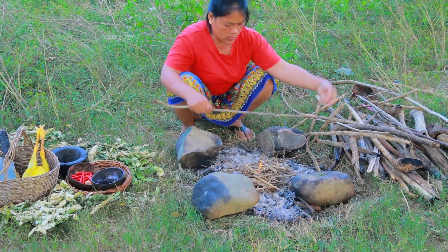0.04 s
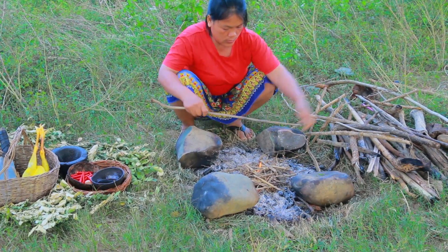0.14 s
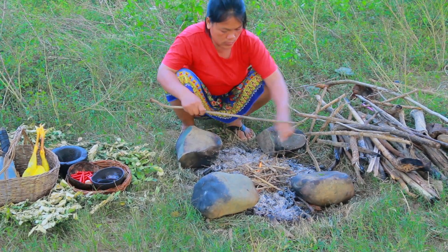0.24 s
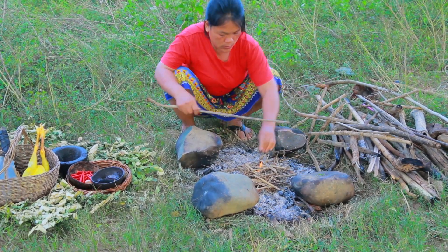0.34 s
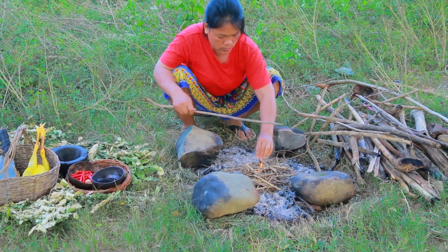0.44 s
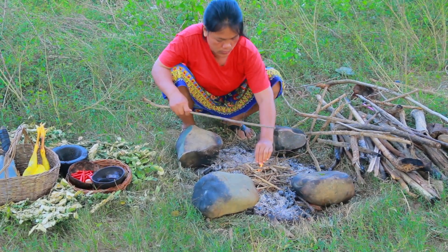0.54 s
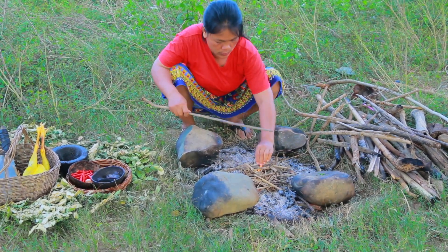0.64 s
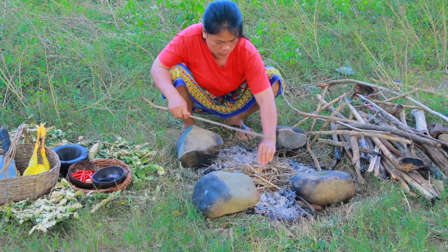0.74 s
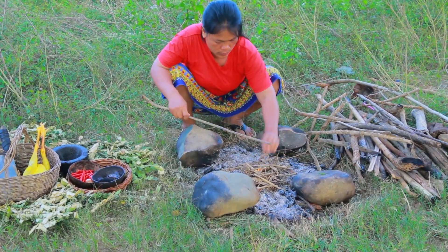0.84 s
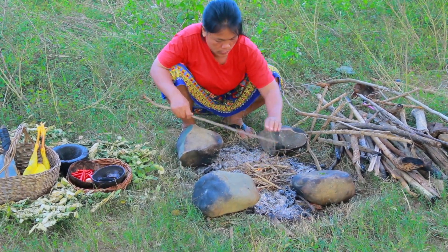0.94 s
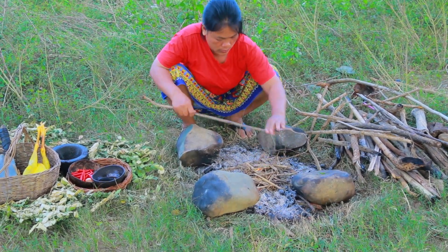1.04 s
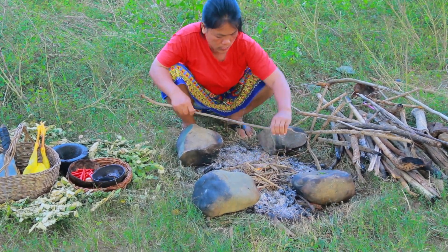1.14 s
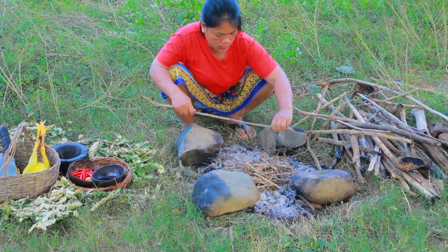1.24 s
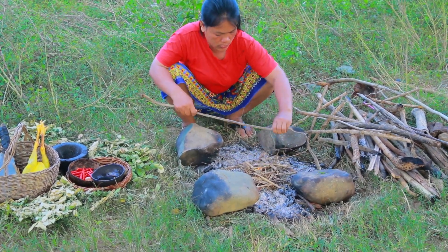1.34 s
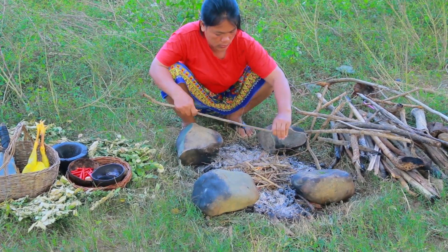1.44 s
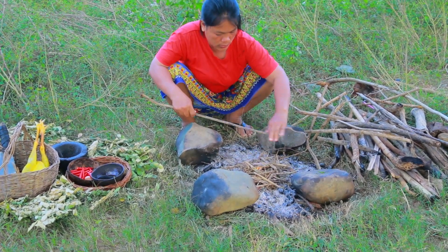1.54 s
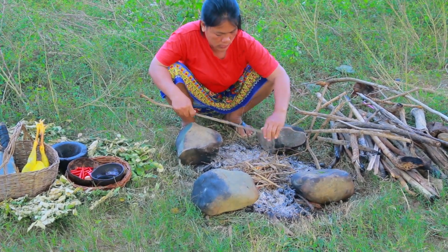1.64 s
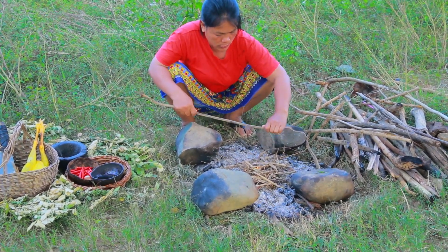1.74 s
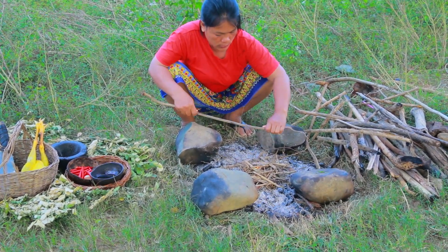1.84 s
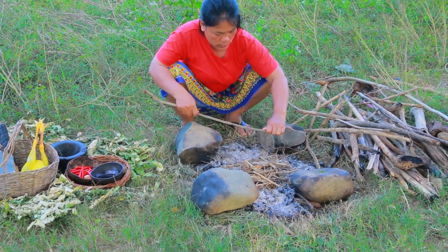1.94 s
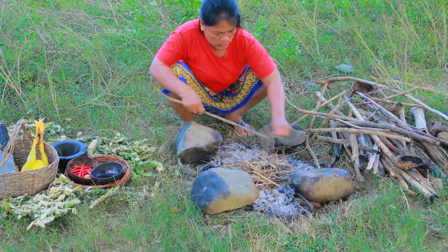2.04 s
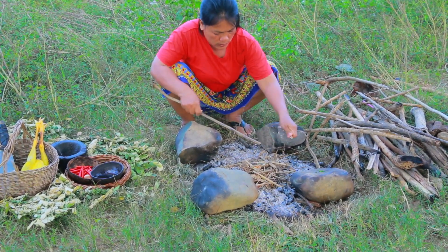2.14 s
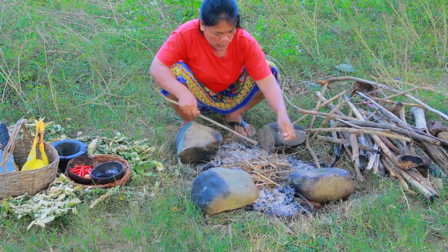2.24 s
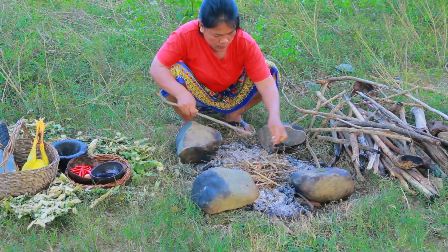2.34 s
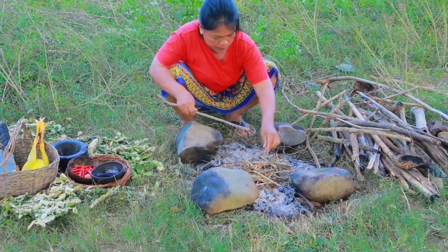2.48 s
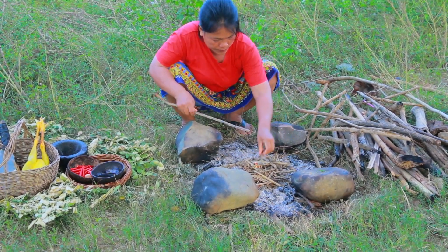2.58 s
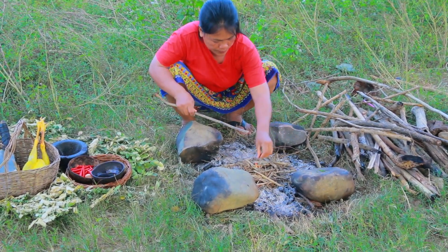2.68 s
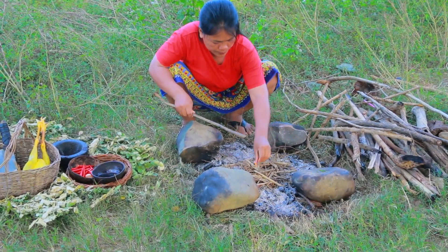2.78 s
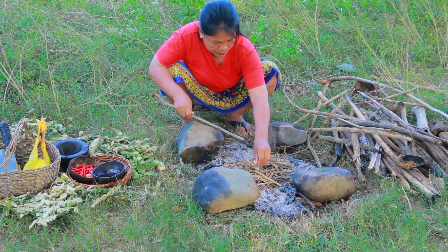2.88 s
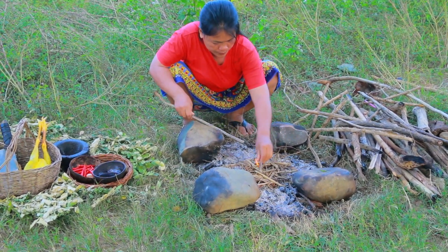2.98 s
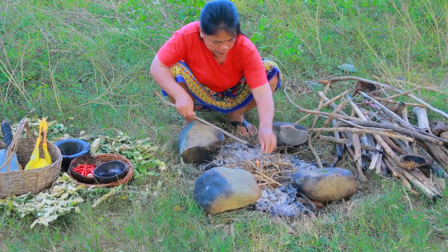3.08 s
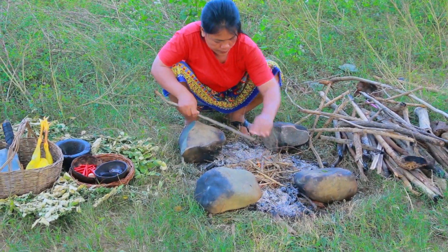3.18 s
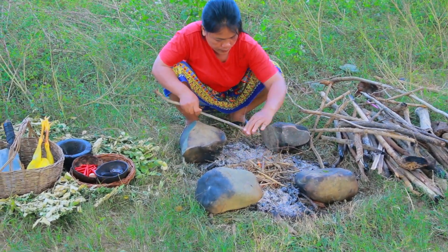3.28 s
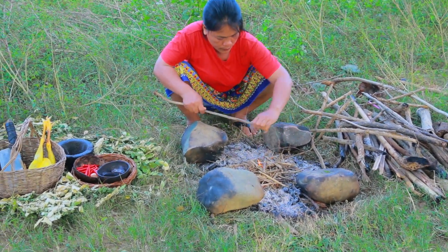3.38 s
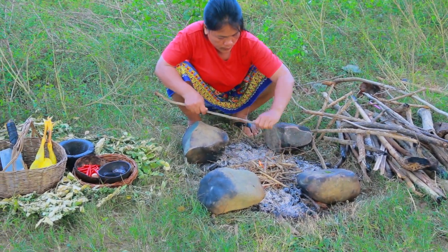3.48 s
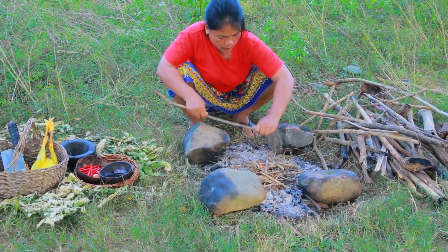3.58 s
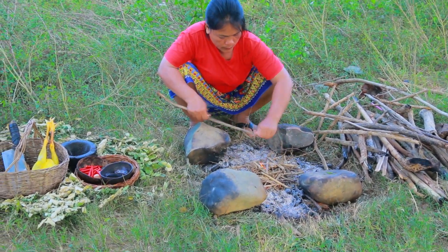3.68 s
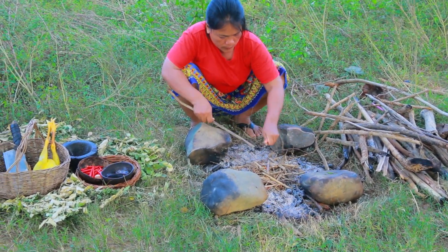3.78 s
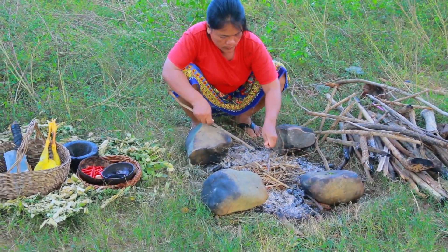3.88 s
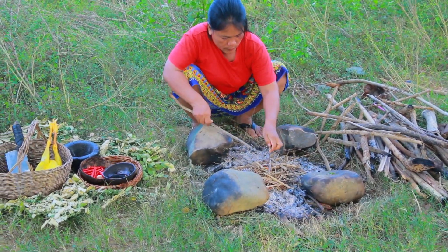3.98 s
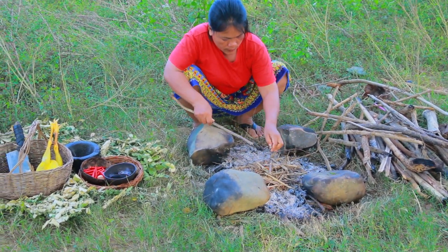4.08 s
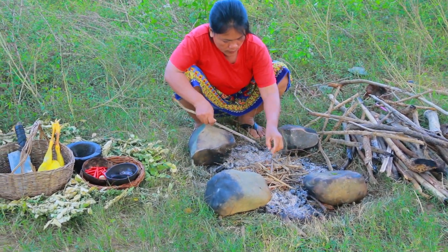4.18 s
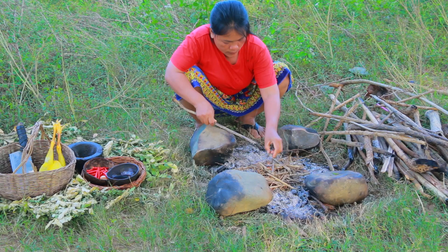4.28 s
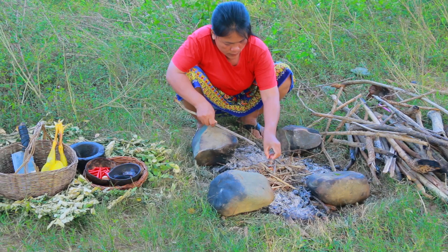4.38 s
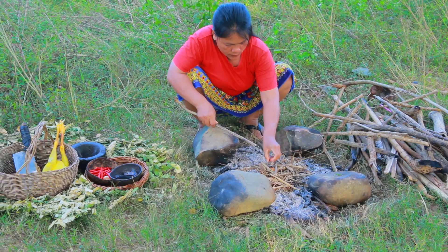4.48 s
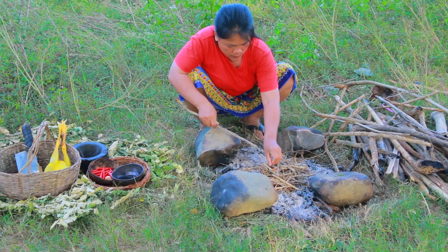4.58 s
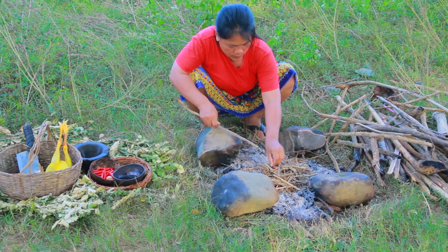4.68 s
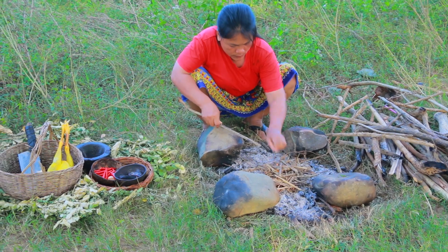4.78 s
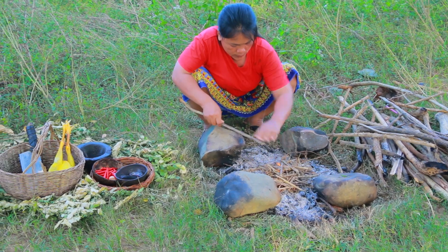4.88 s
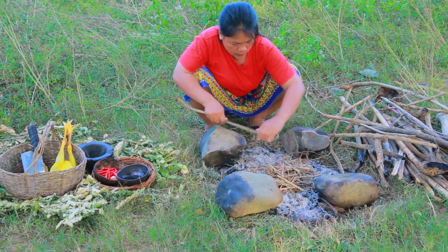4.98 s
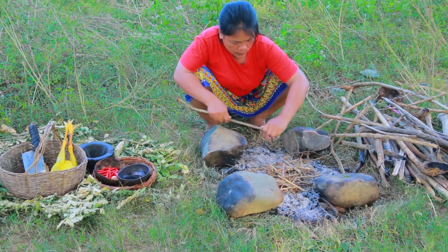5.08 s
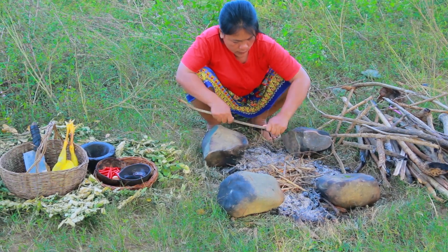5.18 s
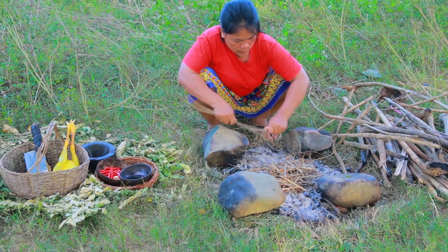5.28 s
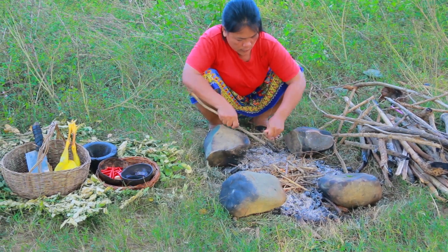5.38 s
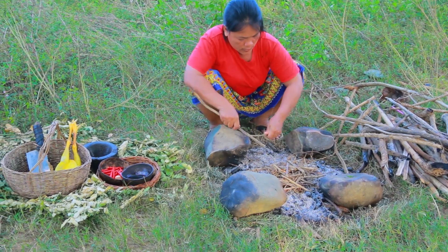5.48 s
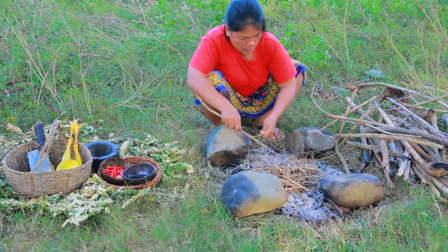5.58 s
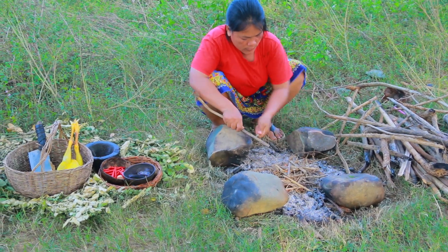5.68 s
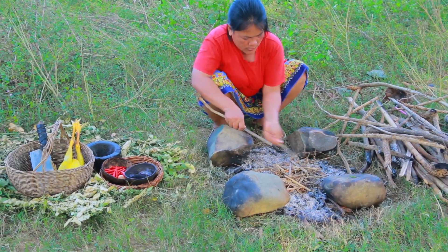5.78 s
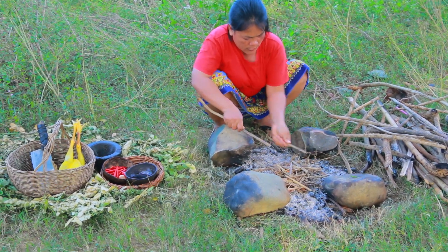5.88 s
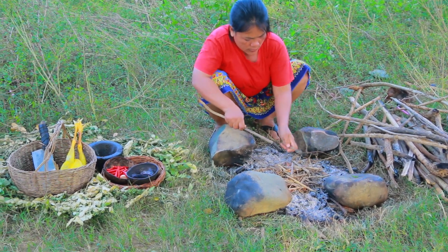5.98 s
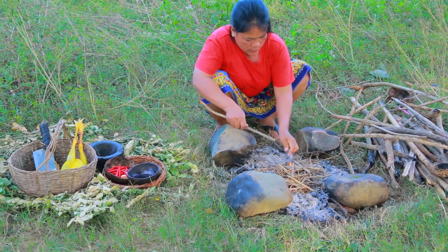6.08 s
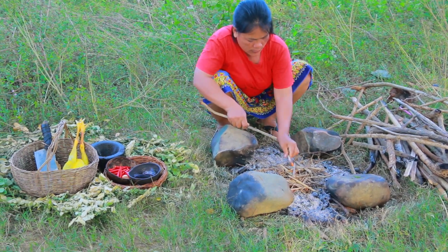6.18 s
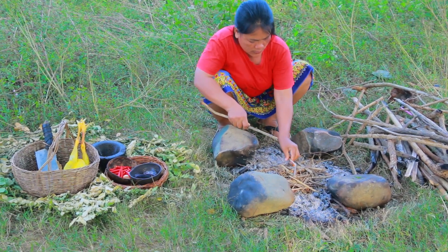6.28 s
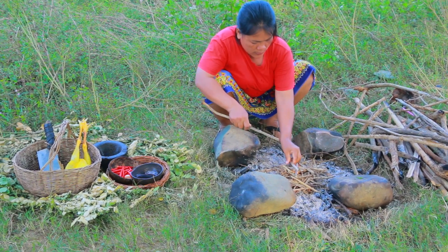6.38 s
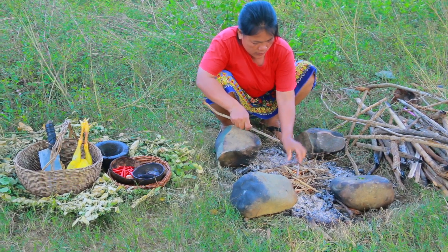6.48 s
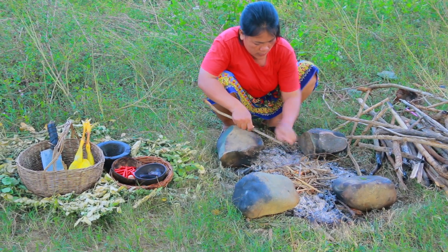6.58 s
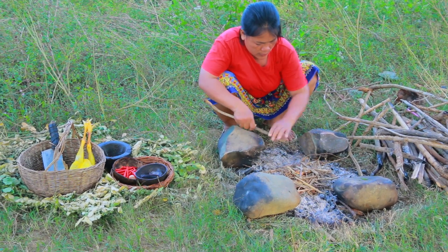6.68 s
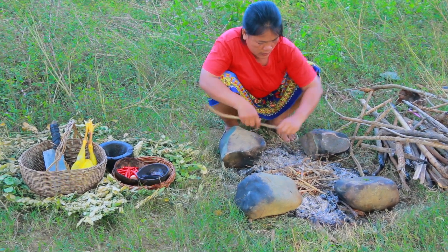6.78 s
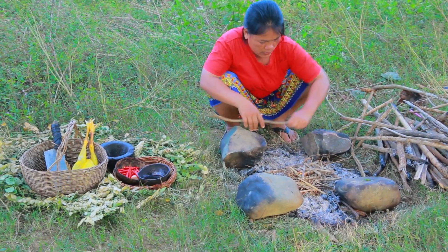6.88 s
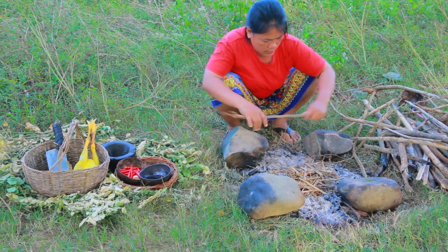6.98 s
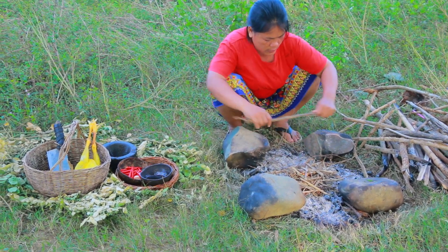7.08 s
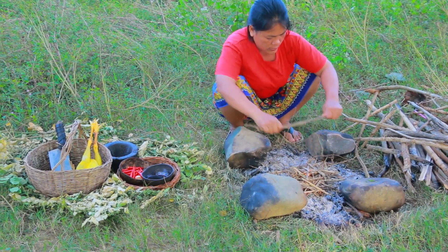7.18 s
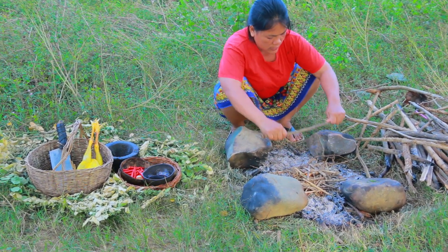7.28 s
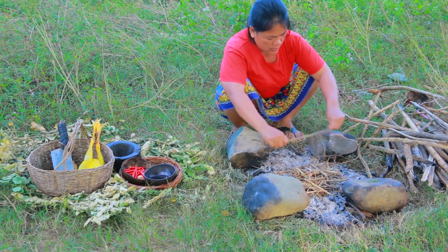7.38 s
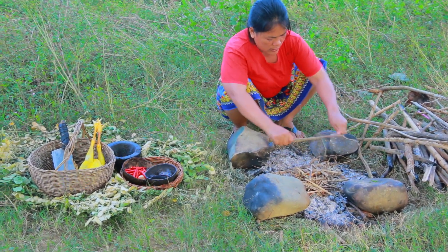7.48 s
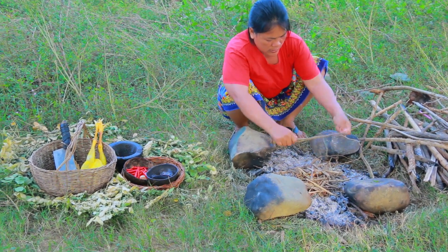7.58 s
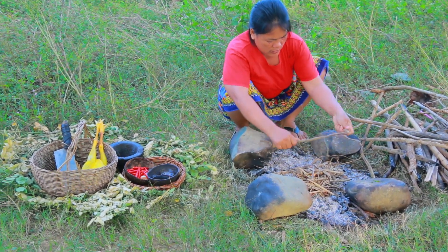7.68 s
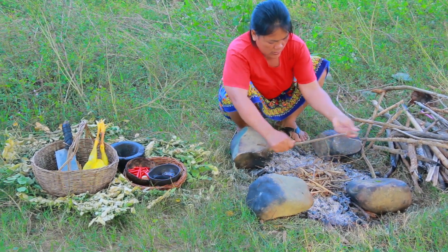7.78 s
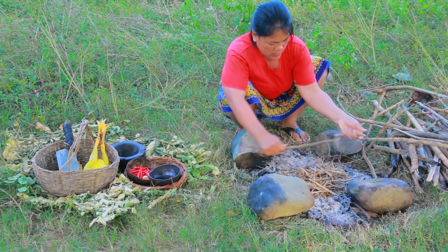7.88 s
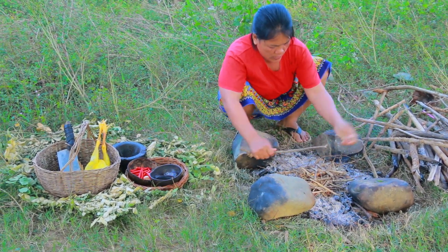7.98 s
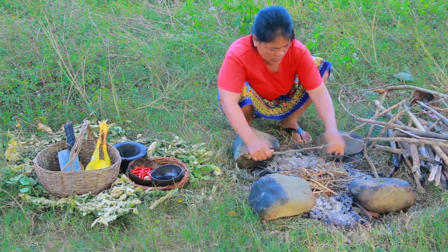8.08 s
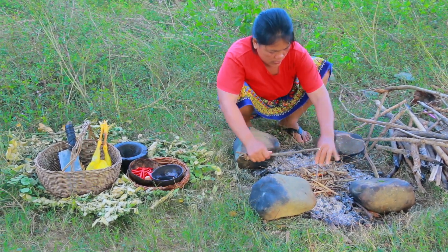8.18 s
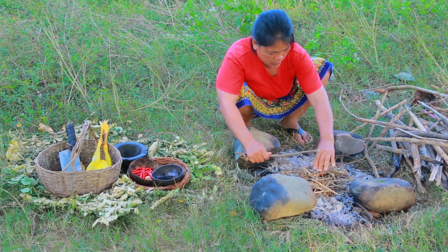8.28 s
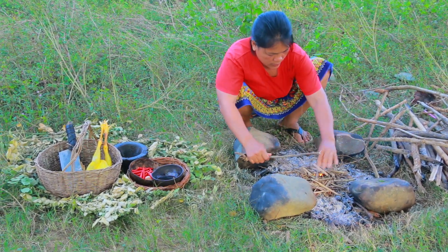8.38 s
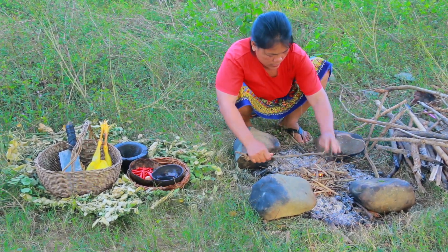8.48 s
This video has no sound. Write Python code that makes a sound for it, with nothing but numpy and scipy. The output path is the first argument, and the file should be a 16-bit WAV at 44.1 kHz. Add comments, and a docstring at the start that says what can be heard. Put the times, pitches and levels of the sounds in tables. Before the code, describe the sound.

A steady distant rush and a soft hiss fill a grassy clearing throughout, with a very faint, high buzz of far insects. For the first three seconds a light breeze buffets mainly the left microphone with low thumps, strongest around 1.5 seconds, then falls calm. Slightly right of centre, a dry stick is bent by hand: a few fibres tick, and it breaks with a loud, sharp crack at about 2 seconds. A softer, hollower snap follows at 3.7 seconds, and a quick double snap at about 5.3 and 5.4 seconds, both led by tiny ticks. Twig taps lightly on twig around 5.7 seconds. Another loud, crisp crack comes at about 7.5 seconds, followed by two faint taps. Each crack leaves a short, bright tail from the surrounding plants. The rush and hiss carry on to the end, near 8.7 seconds.

```python
"""A dry stick is snapped into kindling by hand, in a grassy clearing, a little right of the microphones.
A few fibres tick as it bends, then it cracks, and the plants around scatter each crack into a short
bright tail; now and then twig touches twig. At first a breeze buffets the left microphone.
Behind it all lie a steady distant rush, a hiss from all around and the faint buzz of far insects."""
import sys
import numpy as np
from scipy import signal
from scipy.fft import rfft, irfft, next_fast_len
from scipy.io import wavfile
from scipy.ndimage import uniform_filter1d

SR = 44100
rng = np.random.default_rng(int(sys.argv[2]) if len(sys.argv) > 2 else 0)


def put_to_file(sound):
    """Save the sound as 16-bit audio at rate SR, in the file named by the first command-line argument."""
    columns = np.atleast_2d(sound).T  # one column per channel
    safe = np.clip(columns, -1, 1)
    whole_steps = np.round(safe * 32767)
    wavfile.write(sys.argv[1], SR, whole_steps.astype(np.int16))


N = 376613
TIME = np.arange(N) / SR


def snaps(size=16384, ring_width=0.14, tail_ring=0.59):
    """Each break rings at pitches set by the length of the piece; the echoes blur that ring."""
    # breaks, each with a low and a high ring:
    # start_s, level_db, tear_t60_s, body_db, top_db, low_hz, low_db, high_hz, high_db, scatter_db
    breaks = [(2.0434, -4.5, 0.02, -1.5, 0, 5560, 4, 10300, 6, -12.5),
              (3.7395, -17.5, .023, -1, 3, 1620, 16, 8000, 5.5, -8),
              (3.7424, -17.5, 0.013, -4, 3, 1200, 15, 1570, 7, -13),
              (5.3312, -15.5, 0.025, -7, 0, 3500, 6, 4970, 3, -10),
              (5.4262, -19.5, 0.018, -6, 10, 4900, 7, 9600, 17, -10),
              (7.4570, -6, 0.0092, -3.5, 1, 2860, 7.5, 13200, 7, -16)]
    # resonances of the stick, and one hollow: pitch_hz, width_hz, gain_db
    stick_modes = [(3900, 120, -6), (4340, 160, 5.5), (4940, 130, 4), (5670, 210, 0), (6400, 280, 4.5),
                   (7800, 580, 5.5), (9400, 260, -1), (10400, 350, 0), (11500, 210, 0), (14300, 400, 6)]
    out, t, hz = np.zeros((2, N)), np.arange(size) / SR, bins(size)
    for start_s, db, tear_t60_s, body_db, top_db, low_hz, low_db, high_hz, high_db, scatter_db in breaks:
        rings = [(low_hz, ring_width * low_hz, low_db), (high_hz, ring_width * high_hz, high_db)]
        piece_db = humps(rings, hz)
        wood_db = wood_colour(hz, body_db, top_db)
        crack = fracture(t, wood_db + piece_db + humps(stick_modes, hz), tear_t60_s)
        tail = amp(scatter_db) * scatter(t, wood_db + tail_ring * piece_db)
        add(out, start_s, amp(db) * (crack + tail))
    return out


def fracture(t, colour_db, tear_t60_s, crack_t60_s=0.0013, tear_db=-7, grain_db=3, rise_s=0.000134):
    """A sharp first split, then a dying run of tearing fibres, heard with its bounce off the ground."""
    decay = amp(-60 * t / crack_t60_s) + amp(tear_db - 60 * t / tear_t60_s)
    force = (1 - np.exp(-t / rise_s)) * decay
    mid, side = rng.standard_normal((2, len(t)))
    grain = amp(grain_db * np.repeat(rng.standard_normal(len(t)), 12)[:len(t)])
    crack = force * grain * (mid + 0.26 * side * [[1], [-1]])
    crack[:, round(rise_s * SR)] += 1   # the main bundle of fibres lets go at once
    hz = bins(len(t))
    crack = tint(crack, colour_db + ground_echo(hz))
    half_sample_delay = np.exp(-1j * np.pi * hz / SR)
    crack[0] = irfft(rfft(crack[0]) * half_sample_delay)   # reaches the left microphone later
    return unit_burst(crack)


def wood_colour(hz, body_db, top_db):
    """Colour in dB: thick wood adds body under 4 kHz, thin splinters add top above 11.5 kHz."""
    # spectrum of splitting wood: frequency_hz, level_db
    wood = [(100, -30), (850, -21), (1400, 2), (2200, -0.5), (3000, 0.5), (3900, -1), (4900, -2),
            (10000, -2), (12500, -5.5), (15000, -14), (16000, -28)]
    body = 1 / (1 + (hz / 4000) ** 6)
    top = 1 / (1 + (11500 / hz) ** 16)
    return at_hz(wood, hz) + body_db * body + top_db * top


def ground_echo(hz, strength=0.22, delay_s=0.00202):
    """Comb in dB from the bounce off the ground just after the direct sound."""
    return 20 * np.log10(np.abs(1 + strength * np.exp(-2j * np.pi * hz * delay_s)))


def scatter(t, colour_db, t60_s=0.23, build_s=0.0025):
    """Countless faint echoes from grass and bushes, with the energy of one fracture."""
    # colour that the plants give to scattered sound: frequency_hz, gain_db
    foliage = [(300, -6), (1500, -24), (3000, 2.5), (5000, 5), (10000, 5), (12500, 3.5), (14500, 4),
               (16000, 14)]
    echoes = rng.standard_normal((2, len(t))) * (1 - np.exp(-t / build_s)) * amp(-60 * t / t60_s)
    return unit_burst(tint(echoes, colour_db + at_hz(foliage, bins(len(t)))))


def fibre_ticks():
    """Single fibres give way as the stick bends; the less body one has, the more it rings."""
    # fibres letting go: start_s, level_db, body_db, ring_hz
    fibres = [(1.9680, -50, -10, 9300), (1.9750, -50, -10, 9000), (1.9824, -37.5, -21, 9200),
              (2.0146, -42, -13, 9300), (2.0300, -39, -7, 9000), (3.666, -38, -4, 6000),
              (3.7040, -34.5, -7, 9500), (3.7146, -47, -4, 8000), (5.2928, -33.5, -1, 5200),
              (5.3183, -38, -5, 7000), (5.5037, -38.5, -9, 6500)]
    return sum(tick(start_s, db, body_db, top_db=3, ring_hz=ring_hz, ring_db=-0.5 * body_db)
               for start_s, db, body_db, ring_hz in fibres)


def twig_touches():
    """Twig knocks lightly on twig; they all ring alike."""
    # light touches: start_s, level_db, body_db, top_db
    touches = [(1.3044, -56, -6, 7), (5.6844, -38.5, 4, 11), (5.7714, -42.5, -8, -1), (7.5967, -38, 10, 2),
               (7.833, -46, 0, 0)]
    return sum(tick(*touch, ring_hz=4700, ring_db=5.5) for touch in touches)


def tick(start_s, db, body_db, top_db, ring_hz, ring_db, size=16384, ring_width=0.24, scatter_db=-7):
    """One tiny fracture or tap with one broad ring, and its tail from the plants."""
    out, t, hz = np.zeros((2, N)), np.arange(size) / SR, bins(size)
    colour_db = wood_colour(hz, body_db, top_db) + humps([(ring_hz, ring_width * ring_hz, ring_db)], hz)
    crack = fracture(t, colour_db, tear_t60_s=0.013)
    tail = amp(scatter_db) * scatter(t, colour_db)
    add(out, start_s, amp(db) * (crack + tail))
    return out


def breeze():
    """Eddies thump on the microphones, mostly the windward left one, then the air falls calm."""
    # spectrum of the buffeting: frequency_hz, density_db
    buffet = [(20, -16), (35, -11), (50, 5), (85, 1.5), (150, -1), (250, -14), (450, -39), (1500, -69)]
    eddies = noise(buffet)
    eddies /= np.sqrt(uniform_filter1d(eddies ** 2, size=2600) + 1e-9)   # the wind alone sets the level
    return wind_strength() * eddies * pan(left_db=13)


def wind_strength(peak_s=1.83, peak_db=-46.5, rise_db_per_s=8, fall_db_per_s=36, calm_db=-69.5):
    """Bell-shaped gusts ride on one slow rise and fall of the breeze; their powers add."""
    # gusts on the microphones: peak_s, level_db, length_s
    gusts = [(.35, -43.5, .2), (.55, -47, .1), (.84, -39.5, .11), (1.16, -40.5, 0.2), (1.462, -34, 0.09),
             (1.54, -28.5, 0.063), (1.62, -36, .12), (2.331, -39.5, 0.072), (2.561, -40.5, 0.055),
             (2.83, -47, .05)]
    edge_db = 10.5   # a gust is this much weaker at both ends of its length
    late_s = TIME - peak_s
    swell = amp(peak_db - np.maximum(-rise_db_per_s * late_s, fall_db_per_s * late_s))
    gust_power = sum(amp(db - edge_db * np.minimum((2 * (TIME - at_s) / length_s) ** 2, 20)) ** 2
                     for at_s, db, length_s in gusts)
    return np.sqrt(amp(calm_db) ** 2 + swell ** 2 + gust_power)


def air(rush_db=-39.0, hiss_db=-46.5, lift_db=0.98, settle_s=2.6):
    """A distant rush, a little to the left, and hiss from all around; both ease as the breeze drops."""
    # distant rush, alike at both microphones: frequency_hz, density_db
    rush_spectrum = [(25, -19), (45, -20), (65, -6), (110, -9), (220, -1), (330, -1), (490, -12.5),
                     (1000, -12), (2000, -16), (3200, -23.5), (5000, -34.5), (9500, -52), (16000, -58)]
    # its broad resonances: pitch_hz, width_hz, gain_db
    rush_modes = [(748, 236, 7.5), (1135, 183, 7), (1351, 234, 9), (1796, 300, 6.5), (2536, 364, 9)]
    # hiss, unrelated at the two microphones: frequency_hz, density_db
    hiss_spectrum = [(25, -24), (60, -47), (170, -10), (290, -3), (500, -9.5), (850, -2), (1400, -0.5),
                     (2200, -1.5), (4000, -6.5), (6000, -14), (8300, -17.5), (9600, -17.5), (11500, -23.5),
                     (16000, -34)]
    rush = amp(rush_db) * noise(rush_spectrum, rush_modes, channels=1) * pan(left_db=0.55)
    hiss = amp(hiss_db) * noise(hiss_spectrum) * pan(left_db=-1.5)
    return (rush + hiss) * amp(lift_db / (1 + np.exp(2 * (TIME - settle_s))))


def insects(fade_s=0.25, chorus_db=-78):
    """A far insect buzzes in long calls that swell, hold and fade; others buzz steadily further off."""
    # narrow high band of the buzz: frequency_hz, density_db
    buzz_band = [(6200, -40), (6520, 3), (6760, -1), (7100, -40)]
    # calls: start_s, end_s, level_db
    calls = [(-.3, 2.1, -73), (6.7, 8.1, -74)]
    calling = sum(amp(db) * np.clip(np.minimum(TIME - start_s, end_s - TIME) / fade_s + .5, 0, 1)
                  for start_s, end_s, db in calls)
    return np.hypot(calling, amp(chorus_db)) * noise(buzz_band, channels=1)


def amp(db):
    """Decibels to gain."""
    return 10 ** (np.asarray(db) / 20)


def rms(x):
    """Root mean square."""
    return np.sqrt(np.mean(x ** 2) + 1e-20)


def unit_burst(x):
    """Scale a stereo burst to the energy of 5 ms at rms 1."""
    return x / rms(x) * np.sqrt(.005 * SR / x.shape[1])


def bins(size):
    """Frequencies of a spectrum of this many samples."""
    return np.maximum(np.arange(size // 2 + 1) * SR / size, 1)


def at_hz(points, hz):
    """Read a spectrum on a log-frequency axis."""
    point_hz, point_db = np.array(points).T
    return np.interp(np.log(hz), np.log(point_hz), point_db)


def humps(modes, hz):
    """Bell-shaped lifts in dB, one for each resonance."""
    return sum(db * np.exp(-2 * ((hz - centre) / width) ** 2) for centre, width, db in modes)


def tint(x, curve_db):
    """Causal (minimum-phase) filter with this gain at every frequency bin."""
    cepstrum = irfft(np.log(amp(curve_db)))
    size = len(cepstrum)
    cepstrum[1:size // 2] *= 2
    cepstrum[size // 2 + 1:] = 0
    return irfft(rfft(x, size) * np.exp(rfft(cepstrum)))


def noise(spectrum, modes=(), channels=2):
    """Steady coloured noise, unrelated between channels; rms 1."""
    size = 2 * next_fast_len(N // 2 + 1)
    hz = bins(size)
    white = rng.standard_normal((channels, size))
    coloured = irfft(rfft(white) * amp(at_hz(spectrum, hz) + humps(modes, hz)))[:, :N]
    return coloured / rms(coloured)


def pan(left_db):
    """Gains of the two channels for a left-minus-right level."""
    return amp(np.array([[left_db], [-left_db]]) / 2)


def add(out, start_s, x):
    """Mix a short sound in at a time."""
    at = round(start_s * SR)
    out[:, at:at + x.shape[1]] += x[:, :N - at]


def scene():
    """The stick breaks slightly right of the microphones, over air, insects and breeze."""
    stick = snaps() + fibre_ticks() + twig_touches()
    return stick * pan(left_db=-2.0) + air() + insects() + breeze()


def limiter(x, threshold_db=-8.5, release_db_per_s=140):
    """Loud millisecond bursts pull the gain down; it recovers within tens of milliseconds."""
    power = uniform_filter1d(np.mean(x ** 2, axis=0), size=66)   # over 1.5 ms
    over_db = np.maximum(10 * np.log10(np.abs(power) + 1e-12) - threshold_db, 0)
    held_db = np.maximum.accumulate(over_db + release_db_per_s * TIME) - release_db_per_s * TIME
    return x * amp(-held_db)


def record(dry):
    """The recorder limits the loudest cracks, clips their remaining spikes and cuts above 16 kHz."""
    clipped = np.clip(limiter(dry), -1, 1)
    lowpass = signal.ellip(10, .1, 80, 16000, fs=SR, output="sos")
    return signal.sosfilt(lowpass, clipped)


dry = scene()
out = record(dry)
put_to_file(out)
```